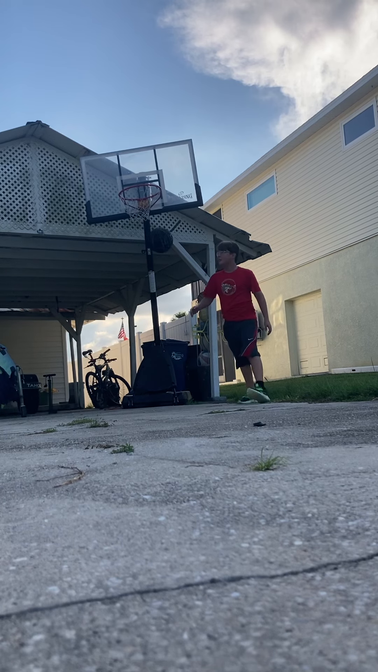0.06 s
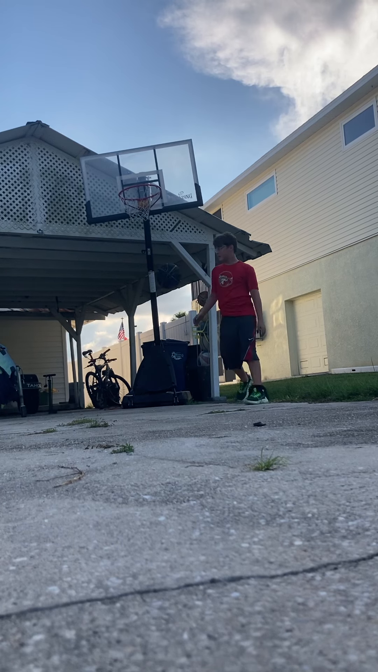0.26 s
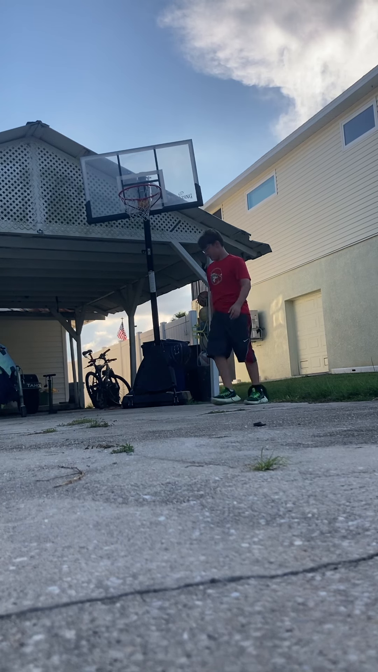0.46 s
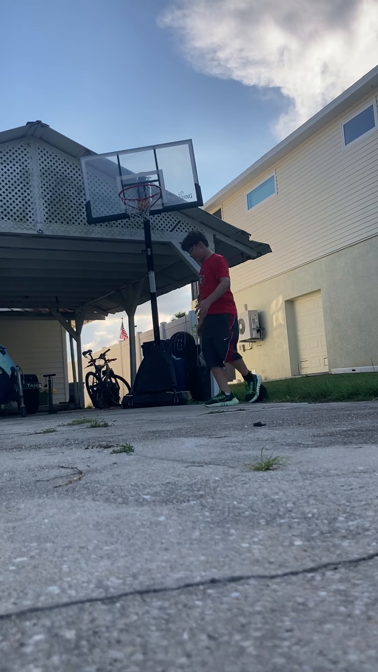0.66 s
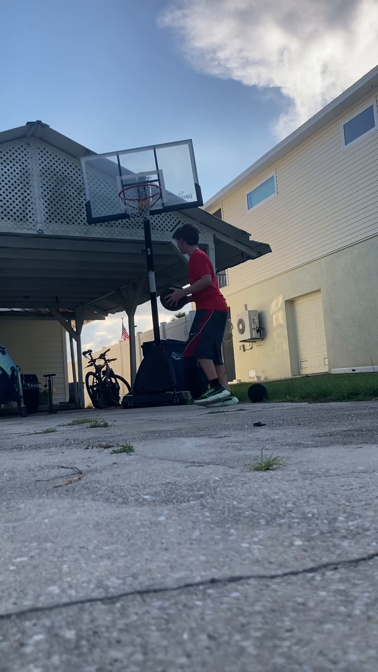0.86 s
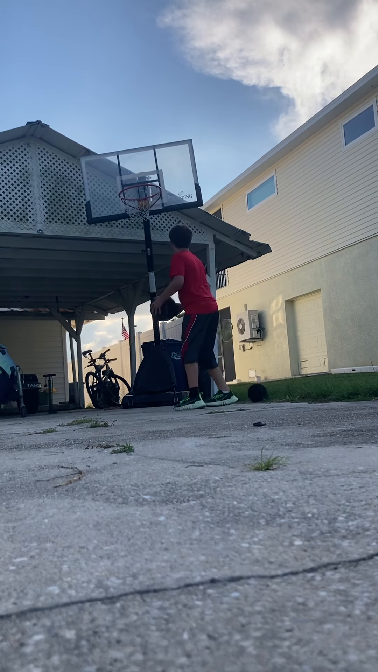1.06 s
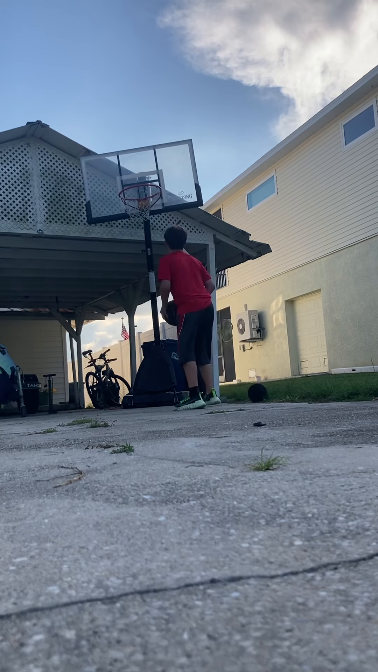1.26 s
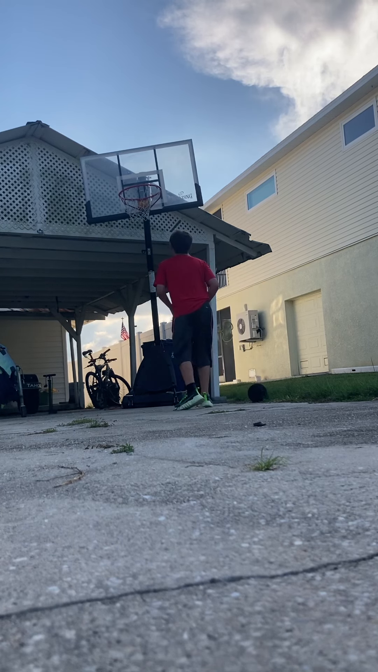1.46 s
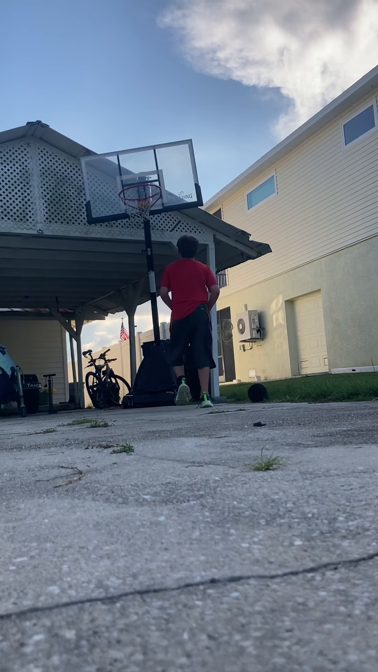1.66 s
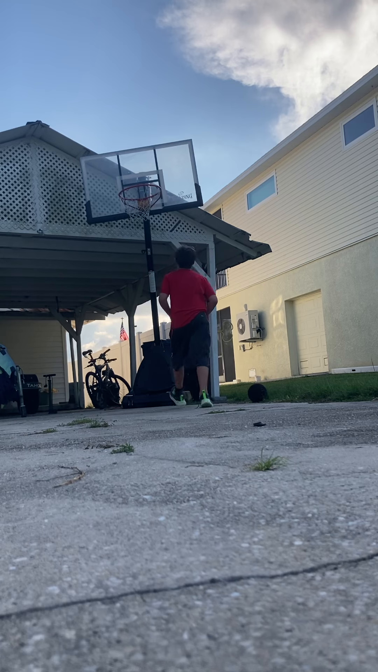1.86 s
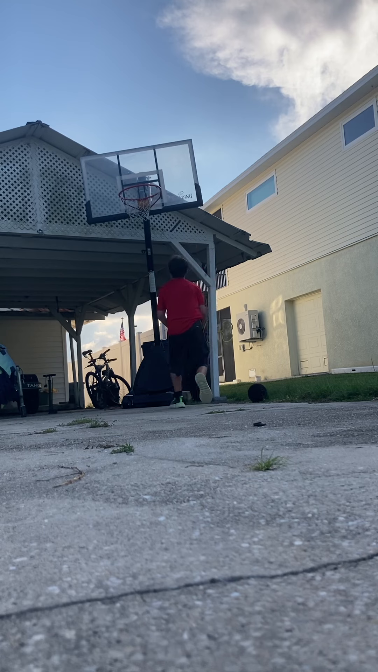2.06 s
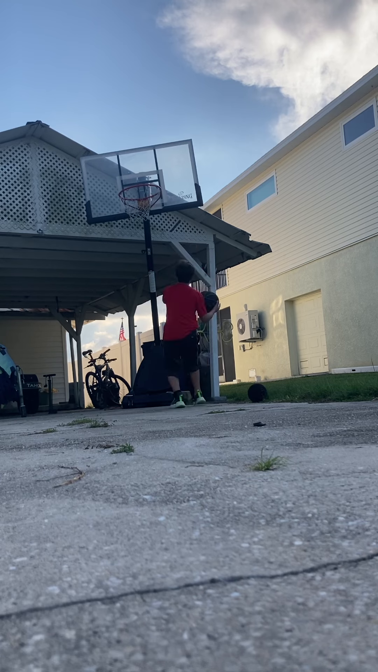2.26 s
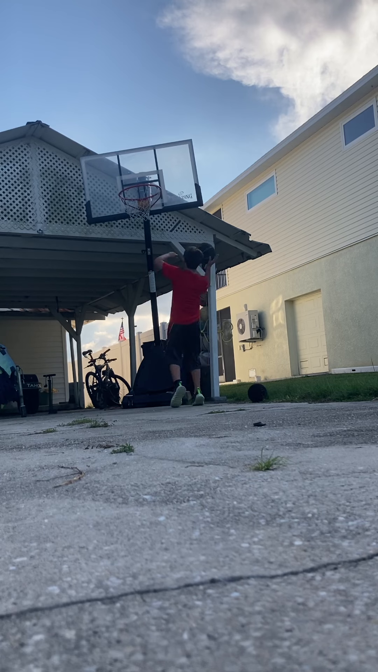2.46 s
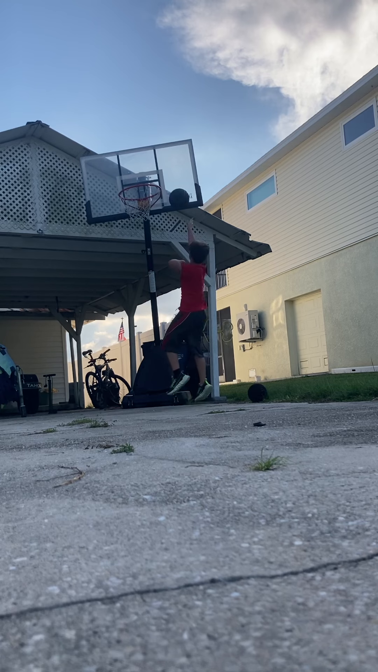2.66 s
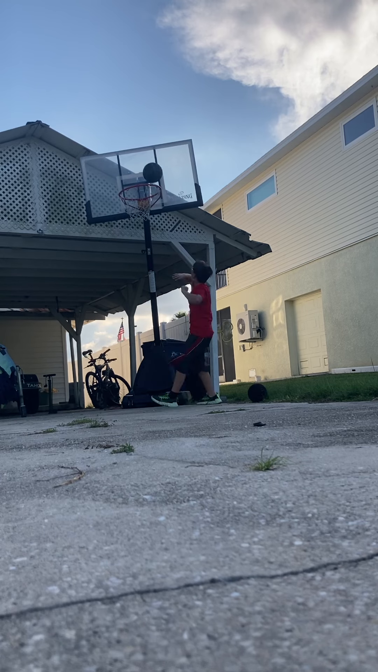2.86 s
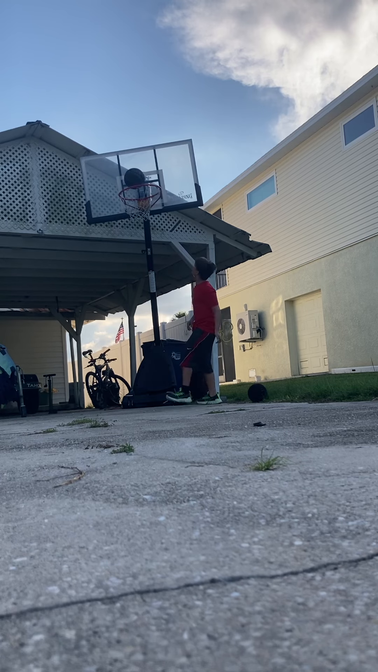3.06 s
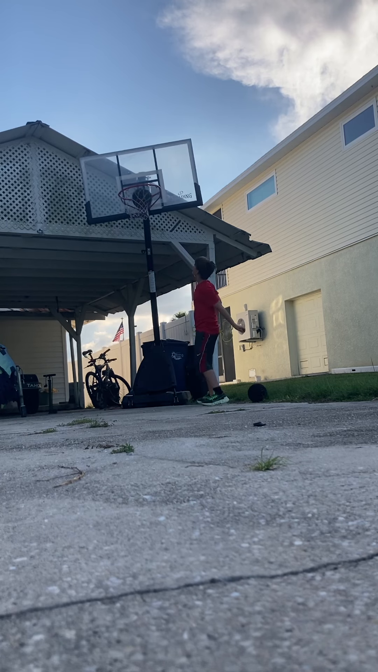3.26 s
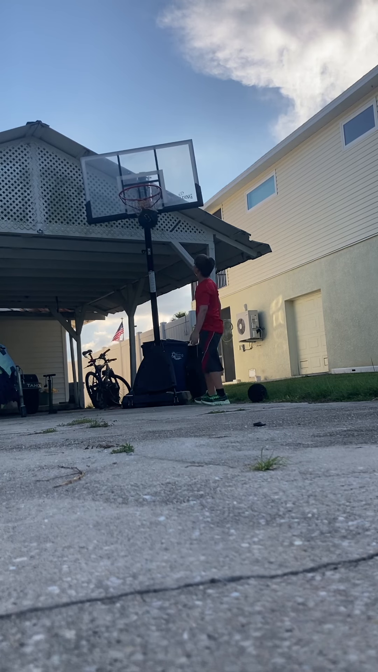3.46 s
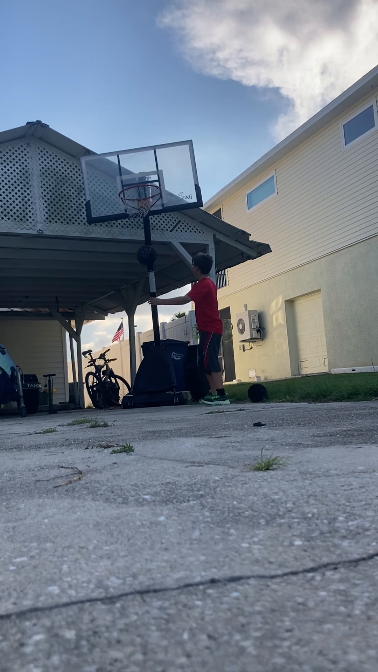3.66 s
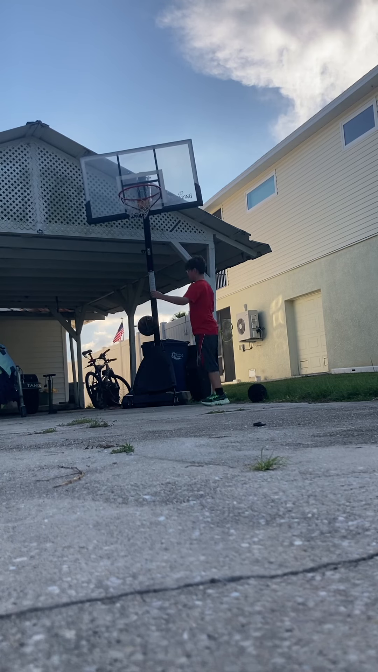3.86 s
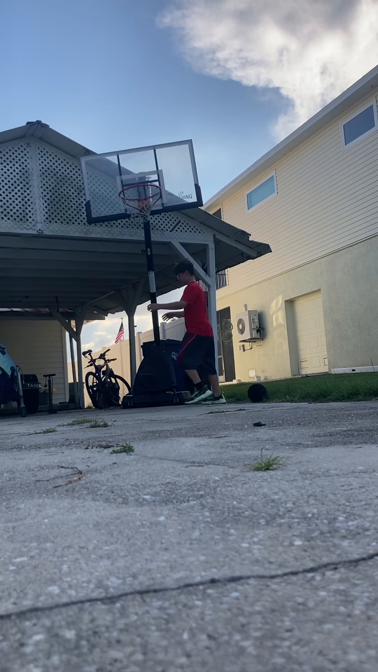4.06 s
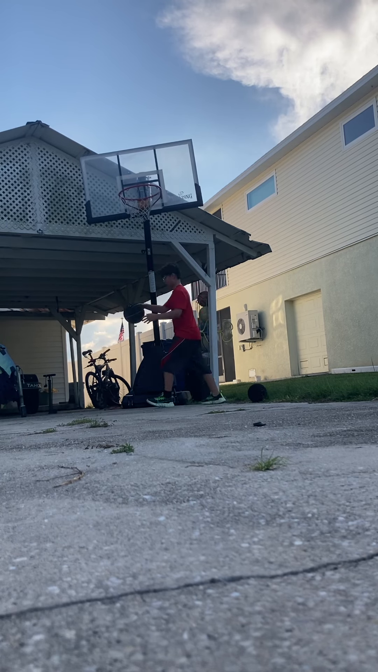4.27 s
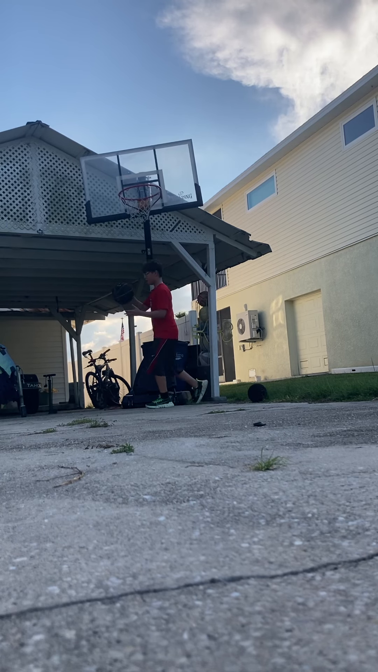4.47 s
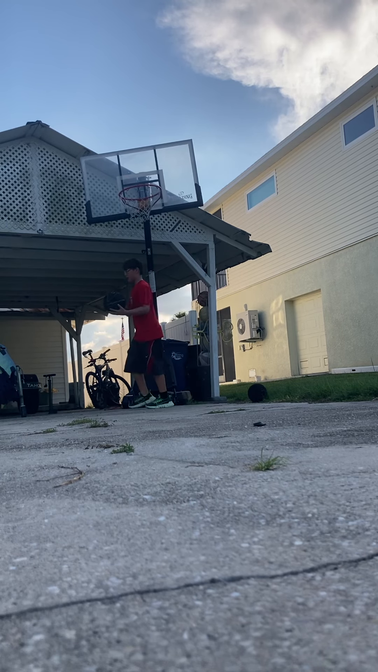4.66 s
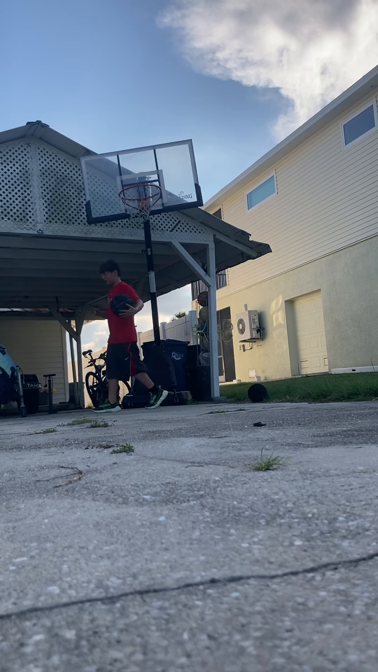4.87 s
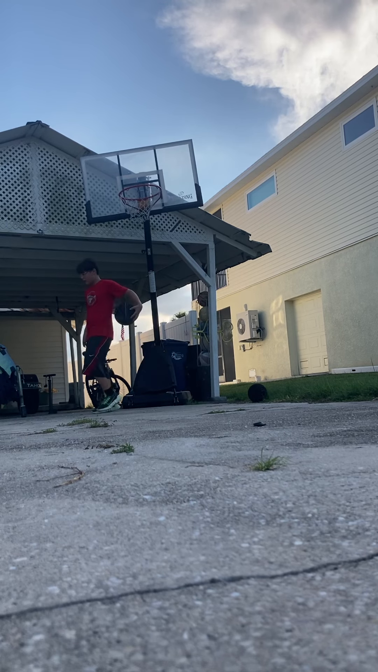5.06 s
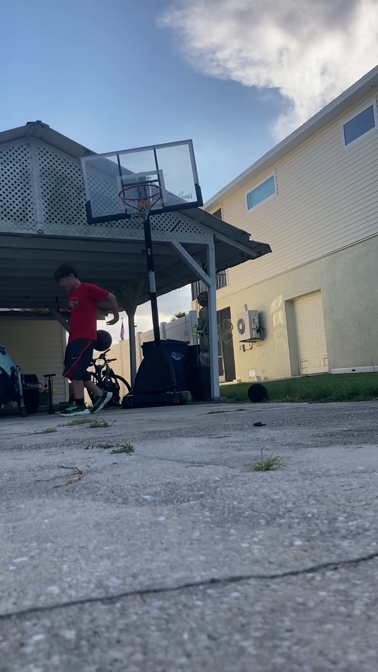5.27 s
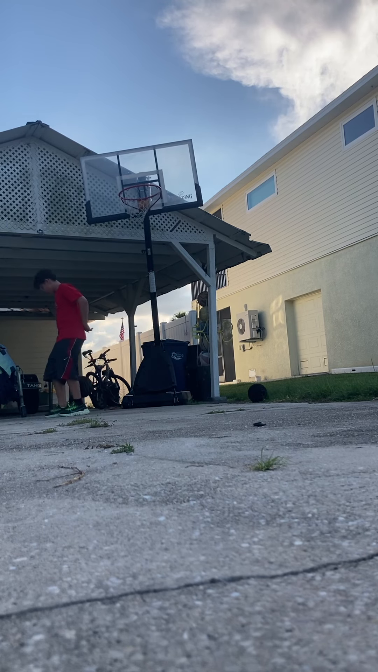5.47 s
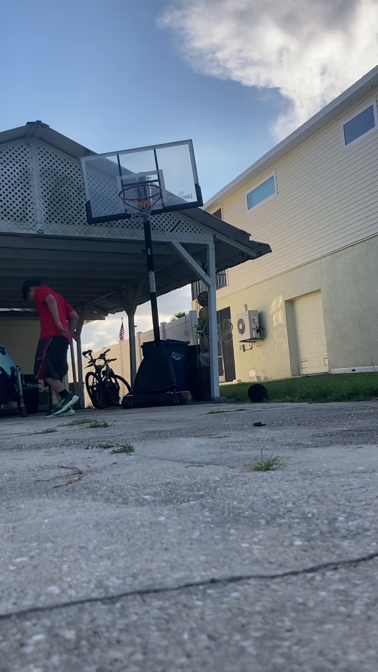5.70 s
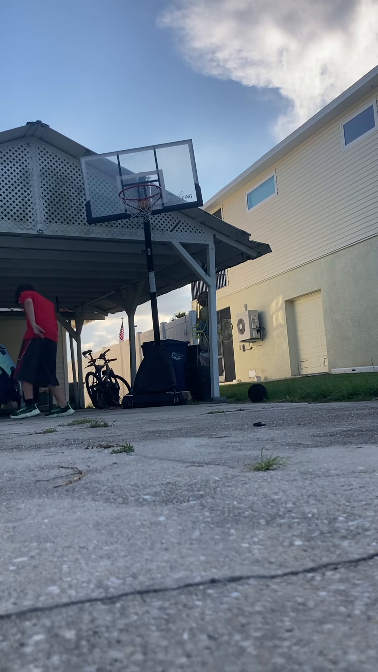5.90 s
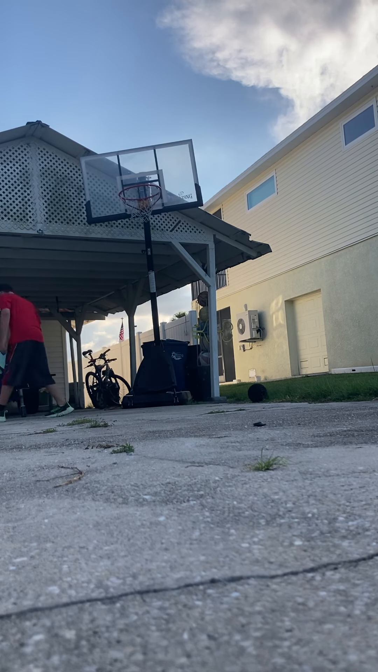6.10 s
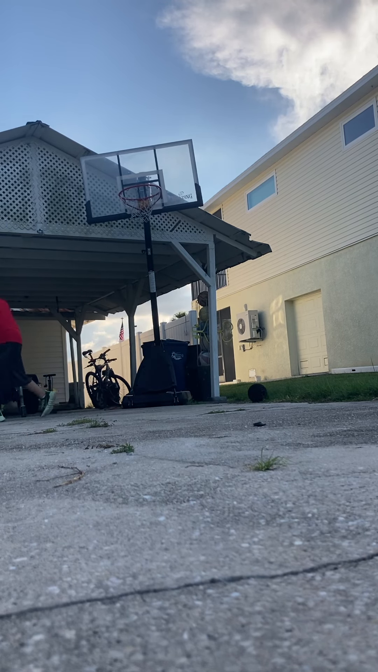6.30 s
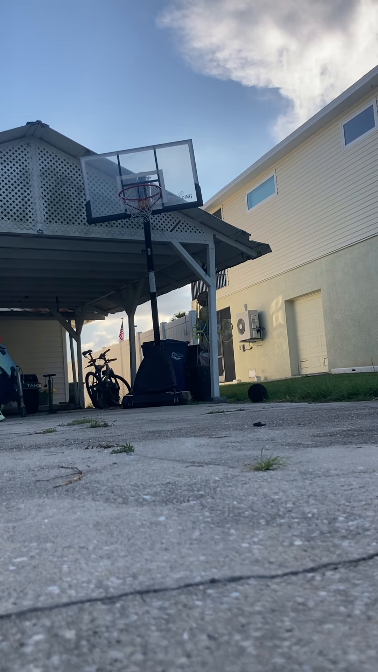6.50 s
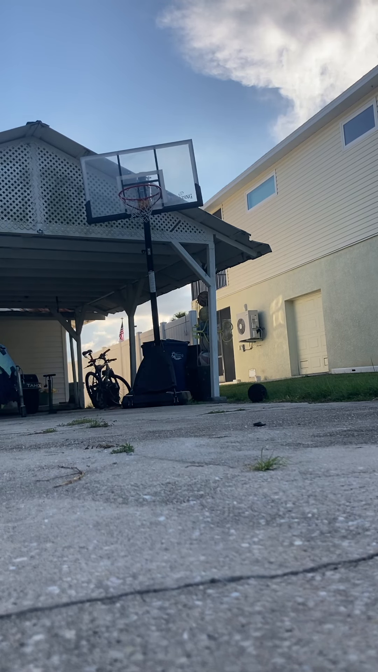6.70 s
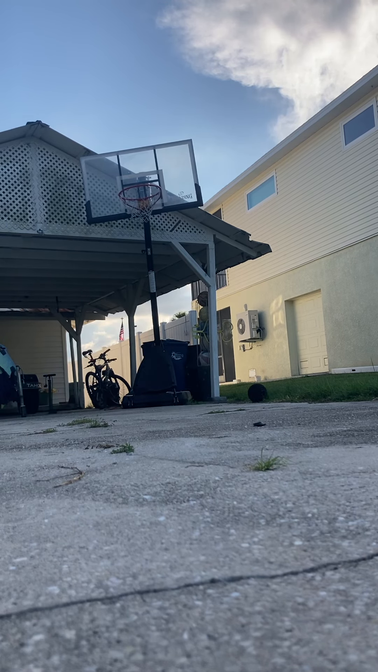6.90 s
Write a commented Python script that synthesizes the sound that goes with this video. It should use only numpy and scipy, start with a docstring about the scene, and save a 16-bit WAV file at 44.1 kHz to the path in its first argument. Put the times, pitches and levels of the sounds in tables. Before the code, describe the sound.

On a concrete driveway between houses, a basketball lands with one loud cracking thud, then shoes scuff on grit. A shot booms off the backboard, clanks the rim, rattles and brushes the net, then smacks the ground hard. Two softer bounces follow with footsteps and palm pats. Distant traffic rumbles low. Ground-level stereo microphones catch short echoes from walls and carport.

```python
"""A basketball thuds and cracks on a concrete driveway; one shot hits the board, rattles the rim and nets.
Deep sweeps, coloured noise and ringing modes make the bounces and hoop; a wall and a carport answer.
Shoes scuff with rough noise and tiny grains of grit; hands pat with soft noise and a sinking knock.
Shaped noise and wavering tones make the distant traffic; a thin band of noise creeps in as an insect.
Two microphones on the ground hear it all."""
import sys
import numpy as np
from scipy import signal
from scipy.fft import rfft, irfft, next_fast_len
from scipy.io import wavfile
from scipy.ndimage import map_coordinates

SR = 44100
rng = np.random.default_rng(int(sys.argv[2]) if len(sys.argv) > 2 else 0)


def generate_wav(signal):
    """Clip the signal to [-1, 1] and save it as 16-bit WAV at the path in sys.argv[1]."""
    frames = np.transpose(np.atleast_2d(signal))
    scaled = np.clip(frames, -1, 1) * 32767
    pcm = np.round(scaled).astype(np.int16)
    wavfile.write(sys.argv[1], SR, pcm)


N = 306054  # length of the scene in samples
T = np.arange(round(.7 * SR)) / SR  # time within one short sound (s)
TOP_HZ = 15900  # upper limit of grain pitches and of the microphones' band

# air inside the ball and its skin: f/Hz, relative level/dB, time to fall 60 dB/s
BALL_MODES = [(379.5, -8.5, 0.31), (475.7, -1.5, 0.21), (544, -5.5, 0.21), (687, -6, 0.18),
              (961, -4, 0.078), (990, -0.5, 0.22), (1248, -3.5, 0.12), (1500, -13, 0.41), (1819, 2, 0.07),
              (2920, -3.5, 0.1)]
# tone colour of a soft slap: f/Hz, relative level/dB
PAT_COLOUR = [(80, -4), (220, 0), (490, 6), (800, 3.5), (1300, 2), (1800, -5), (2400, -25), (5000, -21),
              (16000, -32)]
# tone colour of scraping and cracking grit: f/Hz, relative level/dB
SCRAPE_COLOUR = [(200, 4), (1500, 10), (2300, 3), (3600, 6.5), (6000, 14), (8500, 11.5), (11000, 8),
                 (16000, -3)]


def amp(db):
    """Turn decibels into a gain."""
    return 10 ** (np.asarray(db) / 20)


def unit(x):
    """Scale to an rms level of 1."""
    return x / np.sqrt(np.mean(x ** 2) + 1e-20)


def along(points, hz):
    """Read a curve of (Hz, value) points, with pitch on a log axis."""
    f, v = np.transpose(points)
    return np.interp(np.log(hz + 1), np.log(f + 1), v)


def wobble(rate, size=N):
    """A smooth random curve with rate knots a second."""
    knots = rng.standard_normal(int(size * rate / SR) + 4)
    return map_coordinates(knots, [np.arange(size) * rate / SR])


def filtered(x, response):
    """Multiply the spectrum of x by a complex response to frequency."""
    n = x.shape[-1]
    m = next_fast_len(n + 8192)  # spare room keeps the end from wrapping onto the start
    spectrum = rfft(x, m) * response(np.fft.rfftfreq(m, 1 / SR))
    return irfft(spectrum, m)[..., :n]


def noise(colour, size=len(T)):
    """Random hiss with a given tone colour and an rms level of 1."""
    return unit(filtered(rng.standard_normal(size), lambda hz: amp(along(colour, hz))))


def diffuse(pair):
    """Mix two unrelated signals so that the sound arrives from all around."""
    # how alike left and right are: f/Hz, likeness (1 = the same)
    likeness = [(100, 0.99), (350, 0.93), (800, 0.32), (1300, 0.46), (2400, 0.7), (4300, 0.27), (5600, 1),
                (8500, 1), (12000, 1), (16000, 0.78)]
    turn = lambda hz: np.arccos(np.clip(along(likeness, hz), -1, 1)) / 2
    mid, side = filtered(pair, lambda hz: np.array([np.cos(turn(hz)), np.sin(turn(hz))]))
    return np.array([mid + side, mid - side])


def fade(t60, attack):
    """Loudness of something struck: a quick rise, then a fall of 60 dB in t60 seconds."""
    return amp(-60 * T / t60) * (1 - np.exp(-T / attack))


def ring(modes, spread_db, blur, attack=0.0011):
    """Decaying modes, at new strengths for every blow; shaking blurs their pitch."""
    hz, db, t60 = np.transpose(modes)[:, :, None]
    drift = blur * np.cumsum(rng.standard_normal((len(modes), len(T))), axis=1) / np.sqrt(SR)
    turns = hz * T + rng.random(hz.shape) + drift
    strengths = amp(db + spread_db * rng.standard_normal(hz.shape))
    return np.sum(strengths * fade(t60, attack) * np.sin(2 * np.pi * turns), axis=0)


def add(track, s, sound):
    """Place a sound at s seconds."""
    start = max(round(s * SR), 0)
    track[..., start:start + len(T)] += sound[..., :max(N - start, 0)]


def later(x, delay):
    """Let x arrive delay seconds later."""
    return np.interp(T - delay, T, x, left=0)


def wall(x):
    """The house wall, then the carport, throw back duller copies."""
    wall_s, carport_s = .049, .076  # echo delays
    carport_db = -5  # level against the wall's echo
    copies = later(x, delay=wall_s) + amp(carport_db) * later(x, delay=carport_s)
    return filtered(copies, lambda hz: 1 / (1 + (hz / 1300) ** 2))


def in_yard(x, wet_db):
    """A sound with the scattered answer of walls and carport, in stereo."""
    # how long the answer lasts: f/Hz, time to fall 60 dB/s
    yard_decay = [(80, 0.76), (300, 0.22), (1200, 0.43), (3500, 0.42), (9000, 0.41), (16000, 0.23)]
    hz, t, z = signal.stft(rng.standard_normal((2, len(T))), SR, nperseg=256)
    decaying = z * amp(-60 * t / along(yard_decay, hz)[:, None])
    tail = signal.istft(decaying, SR, nperseg=256)[1][:, :len(T)]
    clumps = amp(3.0 * wobble(210.0, size=len(T)))  # outdoors the reflections come in uneven clumps
    tail = diffuse(tail * clumps * (1 - np.exp(-(T / 0.0075) ** 2)))  # and take a moment to build up
    tail = tail / np.linalg.norm(tail[0])
    return x + amp(wet_db) * signal.oaconvolve(x[None], tail, axes=1)[:, :len(x)]


def squashed(x, lag, corner_hz):
    """A soft contact: the highs come at first touch, the lows as the skin flattens."""
    return filtered(x, lambda hz: np.exp(-2j * np.pi * lag * corner_hz * np.arctan(hz / corner_hz)))


def thump(low_hz, sweep_hz, settle, swell):
    """The ball squashes and springs back: a few deep cycles that swell and sink in pitch."""
    hz = low_hz + sweep_hz * np.exp(-T / settle)
    loudness = (T / swell * np.exp(1 - T / swell)) ** 4
    return loudness * np.sin(2 * np.pi * np.cumsum(hz) / SR)


def grains(length, hz, life, scatter_db, octaves, count):
    """Tiny hard contacts, each with its own moment, pitch and size, thinning out over 2 * length seconds."""
    draws = rng.standard_normal((count, 2))
    starts = length * rng.beta(1.3, 3.0, count) * 2
    pitches = np.clip(hz * 2 ** (octaves * draws[:, 0]), 300, TOP_HZ)
    sizes = amp(scatter_db * np.tanh(draws[:, 1]))
    t = T[:len(T) // 10]
    out = np.zeros(len(T))
    for s, pitch, size in zip(starts, pitches, sizes):
        slot = out[int(s * SR):][:len(t)]
        contact = size * amp(-60 * t / life) * np.sin(2 * np.pi * pitch * t)
        slot += contact[:len(slot)]
    return out


def rub(length, grain_db):
    """A stroke of friction: many tiny slips that swell and die away."""
    slips = unit(amp(grain_db * wobble(702.0, size=len(T))))
    u = 4 * T / length  # loudest after a quarter of the length
    return noise(SCRAPE_COLOUR) * slips * u * np.exp(1 - u)


def traffic():
    """Road rumble and open air, with the wavering notes of far engines that come and go."""
    # tone colour of the road noise: f/Hz, relative level/dB
    road_colour = [(22, -34), (42, -8), (65, 2.5), (95, -1.5), (125, -1), (165, -9), (330, -18), (550, -24),
                   (1250, -31), (2400, -46), (4500, -48.5), (9500, -50), (13000, -59.5), (16000, -66)]
    # engine notes: loudest moment t/s, half length/s, f/Hz, level/dB at the loudest moment before wavering
    engine_notes = [(.3, 0.51, 393.4, -60.5), (0.613, 0.69, 131.5, -44.5), (1.362, 0.35, 340.4, -59.5),
                    (1.842, 0.38, 66.1, -45), (3.89, 0.69, 67.96, -47.5), (6.268, 0.57, 75.26, -37)]
    rumble_db, air_db = -42.5, -39.5  # gains of the low rumble and the airy top
    air_swell_db = .6  # how far the open air swells and sinks
    engine_fade_db = 5  # drop at half a length from the loudest moment
    t = np.arange(N) / SR
    bed = diffuse(np.array([noise(road_colour, size=N), noise(road_colour, size=N)]))
    low = filtered(bed, lambda hz: 1 / (1 + (hz / 280) ** 4))
    rumble = amp(rumble_db + 0.097 * wobble(23.0)) * low
    air = amp(air_db + air_swell_db * wobble(3.87)) * (bed - low)
    out = rumble + air
    for s, half_length, hz, db in engine_notes:
        swell_db = db - engine_fade_db * ((t - s) / half_length) ** 2
        turns = np.cumsum(hz * (1 + 0.0053 * wobble(17))) / SR
        out = out + amp(swell_db + 3.6 * wobble(6.4)) * unit(np.sin(2 * np.pi * turns))
    return out


def insects():
    """A thin, far shrill: a narrow band of noise creeps in and holds."""
    pitch_hz, width_hz, level_db = 9260, 150, -82
    start_s, rise_s = 2.9, 2.5  # when it enters, how long it takes to build
    hiss = rng.standard_normal((2, N))
    shrill = filtered(hiss, lambda hz: 1 / (1 + ((hz - pitch_hz) / width_hz) ** 2))
    rise = np.clip((np.arange(N) / SR - start_s) / rise_s, 0, 1)
    return amp(level_db) * rise * unit(diffuse(shrill))


def pat():
    """A dull, soft slap: noise whose lows lag behind its highs."""
    return squashed(noise(PAT_COLOUR) * fade(t60=0.053, attack=0.0032), lag=0.00792, corner_hz=811)


def grain():
    """One grain of grit cracks: a very short burst of noise."""
    return noise(SCRAPE_COLOUR) * fade(t60=0.0056, attack=.0001)


def feet():
    """The heel lands, the sole scrapes, and grit crunches under it."""
    # footsteps: t/s, scrape level/dB, scrape length/s, heel level/dB
    footsteps = [(0.088, -51, 0.056, -67), (0.526, -40, 0.024, -38), (0.961, -51.5, 0.032, -47),
                 (1.101, -59, 0.059, -57), (1.498, -63.5, 0.1, -49), (1.96, -57, 0.078, -57),
                 (4.286, -64, 0.02, -45), (4.794, -41.5, 0.027, -69), (5.193, -39.5, 0.019, -35.5),
                 (5.487, -44, 0.02, -33.5), (6.616, -55.5, 0.079, -43)]
    # single stones cracking underfoot: t/s, level/dB
    stones = [(0.0824, -41.5), (1.541, -43.5), (1.8565, -47), (2.025, -38.5), (2.5433, -38), (6.262, -37.5)]
    crunch_db = -4  # against the scrape
    grit_hz, grit_life_s = 5250, 0.0069  # typical pitch, ring time
    soles, heels = np.zeros(N), np.zeros(N)
    for s, scrape_db, length, heel_db in footsteps:
        add(heels, s, amp(heel_db) * pat())
        crunch = grains(length, hz=grit_hz, life=grit_life_s, scatter_db=5.0, octaves=0.89, count=36)
        add(soles, s, amp(scrape_db) * (rub(length, grain_db=1.5) + amp(crunch_db) * crunch))
    for s, db in stones:
        add(soles, s, amp(db) * grain())
    return in_yard(soles, wet_db=-10.5) + in_yard(heels, wet_db=1.5)


def hands():
    """Palms catch and push the ball: the slap comes with a hollow knock that sinks in pitch."""
    # palms on the ball: t/s, level/dB
    palm_touches = [(.145, -39), (0.82, -33.5), (4.582, -43.5), (5.284, -26.5), (5.861, -42),
                    (6.288, -40.5)]
    out = np.zeros((2, N))
    knock = thump(low_hz=400.5, sweep_hz=767, settle=0.00772, swell=0.016)
    for s, db in palm_touches:
        touch = amp(db) * (pat() + amp(-6.5) * knock)
        add(out, s, in_yard(touch, wet_db=-4.5) + amp(-26) * wall(touch))
    return out


def net():
    """The cords brush and flick the ball as it drops through."""
    # ball brushing the net: t/s, level/dB, length/s
    net_strokes = [(3.171, -48.5, 0.053), (3.247, -42.5, 0.038), (3.383, -57.5, 0.23), (3.421, -51, 0.019),
                   (3.664, -65, 0.054), (3.76, -62, 0.019)]
    cords = np.zeros(N)
    for s, db, length in net_strokes:
        flicks = grains(length, hz=6470, life=0.004, scatter_db=9.0, octaves=0.84, count=24)
        add(cords, s, amp(db) * (rub(length, grain_db=5.0) + flicks))
    return in_yard(cords, wet_db=-5.5)


def rattle():
    """The board chatters against its frame: an uneven run of short knocks that dies away."""
    # tone colour of the chatter: f/Hz, relative level/dB
    chatter_colour = [(70, -24), (160, 11), (300, 7), (490, 5), (850, -1), (1200, -8), (1700, -18),
                      (2300, -26), (4000, -52), (7000, -31), (16000, -54)]
    mean_gap_s, spread_db = .014, 0.5  # time between contacts, scatter of their strength
    gaps = mean_gap_s * (.4 + 1.2 * rng.random(64))
    sizes = amp(spread_db * rng.standard_normal(len(gaps)))
    starts = ((np.cumsum(gaps) - gaps[0]) * SR).astype(int)
    contacts = np.bincount(starts, sizes, len(T))[:len(T)]
    chatter = unit(signal.fftconvolve(contacts, fade(t60=0.17, attack=0.00046))[:len(T)])
    return noise(chatter_colour) * chatter * fade(t60=0.6, attack=0.0024)


def tinkle():
    """Hooks and bolts shake with the board: a sprinkle of small ringing contacts."""
    return grains(0.099, hz=2580, life=0.024, scatter_db=4.0, octaves=0.9, count=30)


def hoop():
    """Blows ring frame and ball, clank the rim and rattle the board; short knocks and jingles follow."""
    # ball on board and rim, all levels/dB after t/s: frame ring, rattle, clank, ball's air ring, slap
    hoop_hits = [(2.857, -29.5, -39.5, -31.5, -41, -36.5), (3.148, -63, -34, -35, -57, -44),
                 (3.1717, -29, -31.5, -21, -25.5, -35), (3.247, -31, -33, -52, -44, -34),
                 (3.388, -40.5, -43, -40, -49, -53), (3.422, -40, -43.5, -42, -44, -50)]
    # short knocks: loose joints of the board, then the ball knocking round inside the rim:
    # t/s, level/dB, nominal f/Hz (each sinks from above it to below)
    hoop_knocks = [(2.942, -48, 1200), (3.012, -46, 1120), (3.152, -46, 1280), (3.161, -36, 750),
                   (3.222, -45, 2030), (3.250, -29, 826), (3.266, -36, 935), (3.426, -47.5, 1880)]
    # fittings as the hoop kicks back and sways: t/s, ring level/dB, high ping level/dB
    fitting_jingles = [(2.905, -52, -60), (2.944, -70, -61), (3.008, -64, -75), (3.185, -64, -62),
                       (3.258, -54, -54), (3.388, -57, -55), (3.422, -54, -55.5), (3.618, -56.5, -71),
                       (3.672, -58, -80), (3.884, -57.5, -65)]
    # backboard, pole and rim: f/Hz, relative level/dB, time to fall 60 dB/s
    frame_modes = [(86, -5, 0.42), (121.6, 0, 0.58), (146, -4.5, 0.35), (172.9, -4.5, 0.57),
                   (273, 0.5, 0.13), (364, -17, 1), (477, -18, 0.12), (815, -29, 0.21), (1139, -15.5, 0.21),
                   (1165, -24, 1)]
    # steel ring damped by the ball: f/Hz, relative level/dB, time to fall 60 dB/s
    rim_modes = [(1990, 4.5, 0.12), (2140, -8, 0.06), (2416, 5, 0.043), (2567, 2, 0.068), (2946, 2, 0.04),
                 (2940, -8, 0.033), (3560, -6, 0.05), (8300, 0, 0.021)]
    # fittings: f/Hz, relative level/dB, time to fall 60 dB/s
    steel_modes = [(2130, -9, 0.19), (2970, -11, 0.16), (3465, -8, 0.39), (3880, 0, 0.079),
                   (4030, -4, 0.11), (4370, -3, 0.074), (4730, -3, .09)]
    # their high ping: f/Hz, relative level/dB, time to fall 60 dB/s
    ping_modes = [(9940, 0.5, 0.12), (10400, -3, .14), (13500, -18, .19)]
    # tone colour of the clank: f/Hz, relative level/dB
    clank_colour = [(200, 23), (1200, -11), (2000, -2), (3000, 3), (4400, 5.5), (6000, 0), (8300, -23),
                    (10000, -28), (16000, -55)]
    tinkle_db = -21  # against the rattle
    blows, jingle = np.zeros(N), np.zeros(N)
    for s, ring_db, rattle_db, clank_db, air_db, slap_db in hoop_hits:
        frame = squashed(ring(frame_modes, spread_db=3.5, blur=0.9), lag=0.0061, corner_hz=400)
        rim = amp(-25.0) * ring(rim_modes, spread_db=6.5, blur=1.6)
        clank = noise(clank_colour) * fade(t60=0.013, attack=0.000081) + rim
        air = ring(BALL_MODES, spread_db=4.0, blur=1.97)
        air = filtered(air, lambda hz: 1 / (1 + (hz / 750) ** 4))
        slap = noise(PAT_COLOUR) * fade(t60=0.059, attack=0.00043)
        slap = squashed(slap, lag=0.00402, corner_hz=772)
        shaking = rattle() + amp(tinkle_db) * tinkle()
        metal = amp(ring_db) * frame + amp(clank_db) * clank + amp(rattle_db) * shaking
        add(blows, s, metal + amp(air_db) * air + amp(slap_db) * slap)
    for s, db, hz in hoop_knocks:
        knock = thump(low_hz=0.855 * hz, sweep_hz=0.47 * hz, settle=0.0027, swell=0.0038)
        add(blows, s, amp(db) * knock)
    for s, db, ping_db in fitting_jingles:
        steel = amp(db) * ring(steel_modes, spread_db=0.5, blur=2.2)
        ping = amp(ping_db) * ring(ping_modes, spread_db=3.5, blur=3.0)
        add(jingle, s, steel + ping)
    return in_yard(blows, wet_db=-5.5) + in_yard(jingle, wet_db=-3)


def snap(hz):
    """The skin flattens: a few quick cycles that plunge in pitch as the contact spreads."""
    pitch = hz / (1 + T / 0.001613)
    return fade(t60=0.036, attack=0.0011) * np.sin(2 * np.pi * np.cumsum(pitch) / SR)


def click(hz):
    """The panel of skin that lands first rings briefly at its own, slightly unsteady pitch."""
    cycles = 19  # cycles in which it falls by 60 dB
    return ring([(hz, 0, cycles / hz)], spread_db=2, blur=9.6, attack=0.00054)


def bounces():
    """Rubber cracks on concrete, the skin slaps, the air inside rings, and the house wall answers."""
    # ball on concrete: t/s, thump level/dB, thump's final f/Hz, thump rise/s, slap level/dB,
    # air ring level/dB, crack level/dB, snap level/dB, snap's starting f/Hz, brightness f/Hz,
    # wall echo gain/dB, yard answer gain/dB (the crack's is lower), click level/dB, click f/Hz
    ball_bounces = [(0.5717, -14, 74.3, 0.013, -20.5, -43, -11.5, -18, 2615, 4500, -10.5, -3.5, -18.5, 1170),
                    (4.0499, -13, 84, 0.0138, -18.5, -27, -9.5, -16.5, 3020, 2300, -7.5, -8, -12, 1844),
                    (5.557, -23, 70.4, 0.016, -24.5, -42, -35, -27.5, 2180, 1160, -6, -3.5, -31.5, 1370),
                    (6.026, -22.5, 83, 0.019, -23, -37.5, -19, -24, 2983, 1900, -8.5, -2.5, -20, 3510)]
    # tone colour of the crack: f/Hz, relative level/dB
    crack_colour = [(200, -33), (1000, 8), (1800, 7), (2300, -4), (3000, 2.5), (4400, 0.5), (6000, -3.5),
                    (8500, -8.5), (12000, -15.5), (16000, -19)]
    # tone colour of the slap: f/Hz, relative level/dB
    slap_colour = [(60, -26), (170, 14.5), (300, 5.5), (520, -2), (850, 2), (1200, 1), (1750, -7),
                   (2300, -16.5), (3300, -20), (5500, -19.5), (9000, -22.5), (16000, -43)]
    ball_spread_db = 2  # how far the ball's modes differ from bounce to bounce
    out = np.zeros((2, N))
    for (s, thump_db, thump_hz, rise, slap_db, air_db, crack_db, snap_db, snap_hz, bright_hz,
         echo_db, yard_db, click_db, click_hz) in ball_bounces:
        skin = amp(slap_db) * noise(slap_colour) * fade(t60=0.083, attack=0.000074)
        air = amp(air_db) * ring(BALL_MODES, spread_db=ball_spread_db, blur=2.08)
        body = filtered(skin + air, lambda hz: 1 / (1 + 1j * hz / bright_hz))  # a lower corner is duller
        slap = squashed(body, lag=0.006106, corner_hz=866) + amp(snap_db) * snap(snap_hz)
        crack = amp(crack_db) * noise(crack_colour) * fade(t60=0.0048, attack=0.00031)
        crack = crack + amp(click_db) * click(click_hz)
        low = amp(thump_db) * thump(low_hz=thump_hz, sweep_hz=121.0, settle=0.0081, swell=rise)
        add(out, s, in_yard(crack, wet_db=yard_db - 5.0))
        add(out, s, in_yard(slap, wet_db=yard_db))
        add(out, s, in_yard(low, wet_db=-13.5))
        add(out, s, amp(echo_db) * wall(low + slap))
    return out


def scene():
    """Everything heard from the ground, from the background to the bouncing ball."""
    return traffic() + insects() + feet() + hands() + net() + hoop() + bounces()


def record(dry):
    """Two microphones differ in level and phase, lose the deepest bass and stop at a top pitch."""
    # left minus right: f/Hz, level/dB
    level_tilt = [(100, 1.44), (300, 1), (550, 3.5), (1100, 0.5), (2000, -2.5), (4000, 3), (8000, 0.3)]
    # phase lead of the left microphone: f/Hz, lead/radians
    phase_lead = [(100, 0), (500, -.2), (1200, -1), (1850, .3), (2400, 2.2), (3000, 1), (3900, .9),
                  (5400, 3.1), (7000, 4.5), (8500, 6.2), (9600, 7), (11800, 9.4), (14800, 12.4)]
    halves = np.array([[.5], [-.5]])  # each side takes half of the difference
    ports = lambda hz: halves * (np.log(amp(along(level_tilt, hz))) + 1j * along(phase_lead, hz))
    low_cut = lambda hz: 1 - 1 / (1 + (hz / 31) ** 7)
    return filtered(dry, lambda hz: np.exp(ports(hz)) * low_cut(hz) * (hz < TOP_HZ))


dry = scene()
out = record(dry)
generate_wav(out)
```